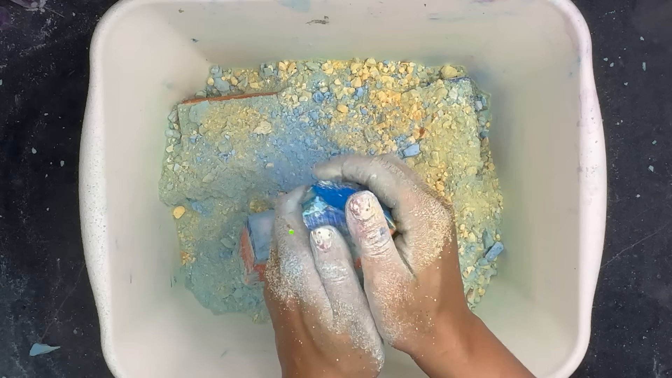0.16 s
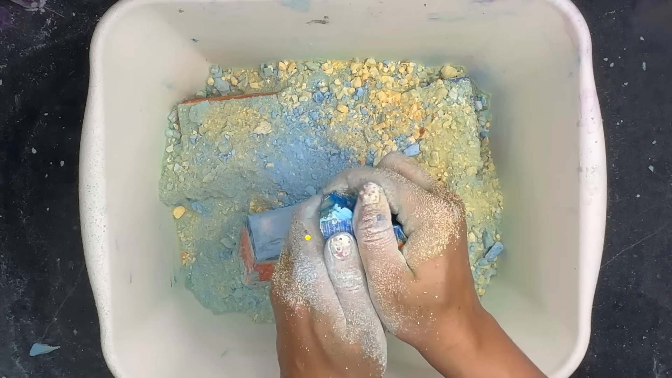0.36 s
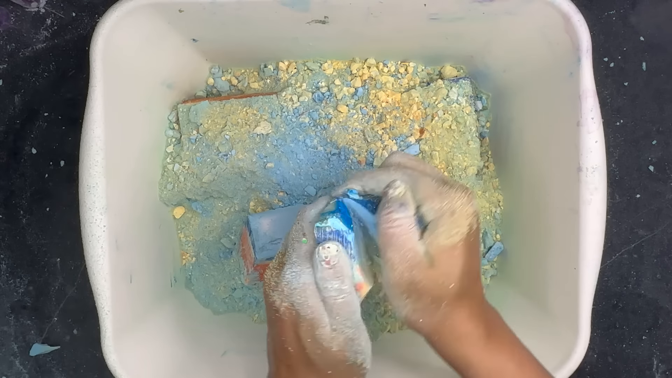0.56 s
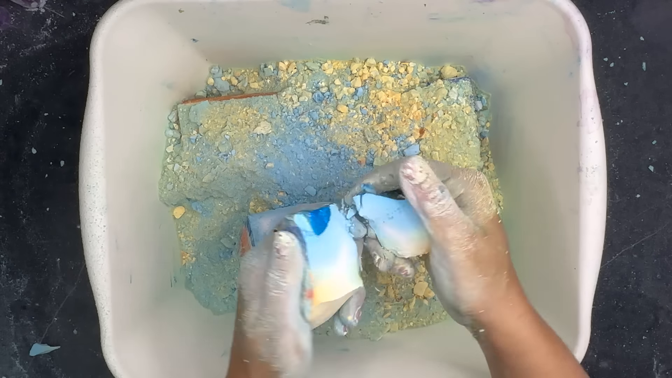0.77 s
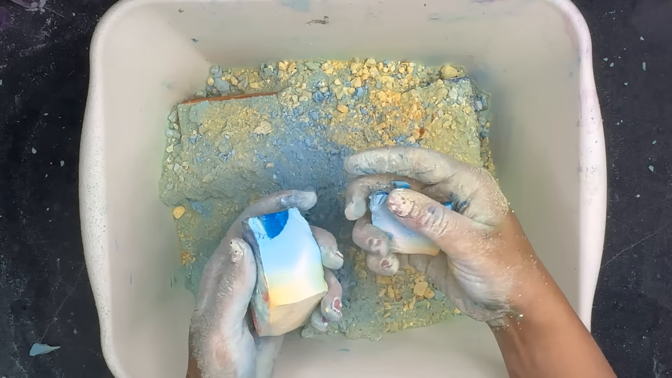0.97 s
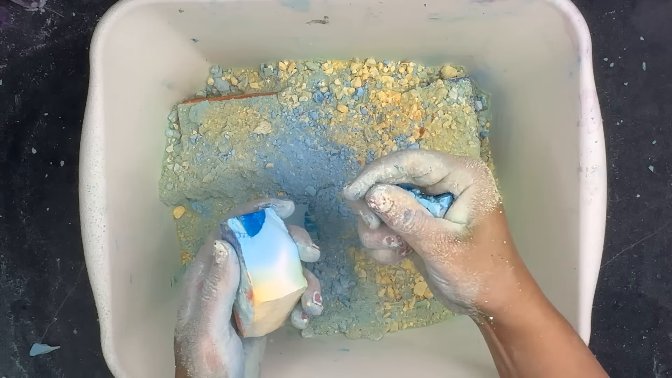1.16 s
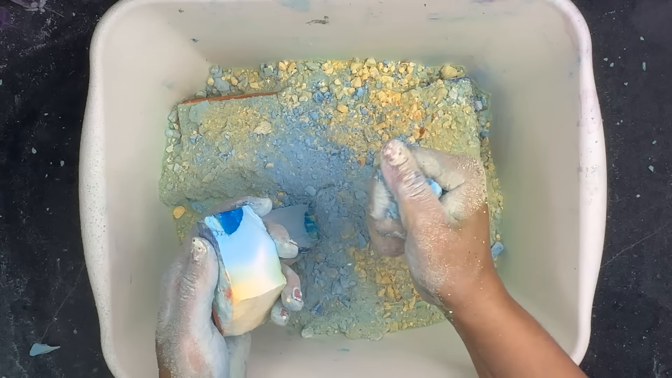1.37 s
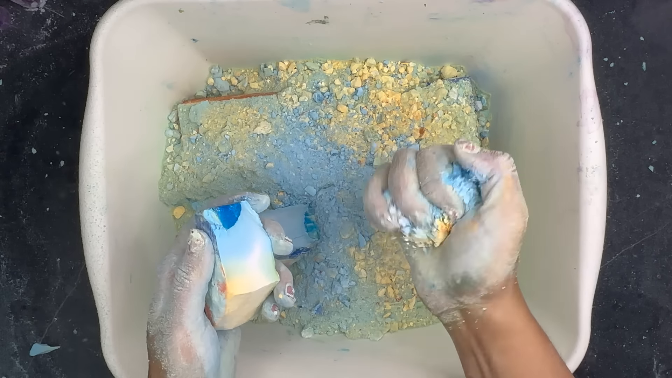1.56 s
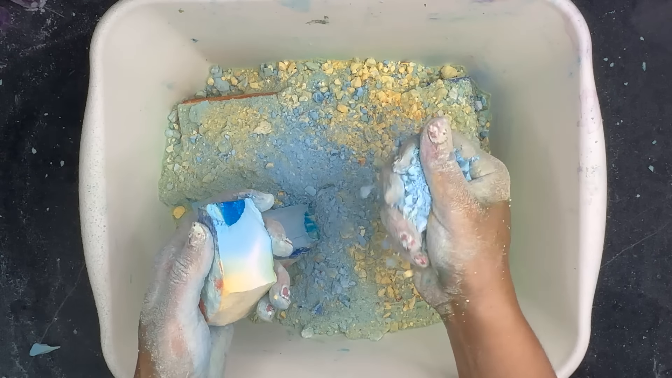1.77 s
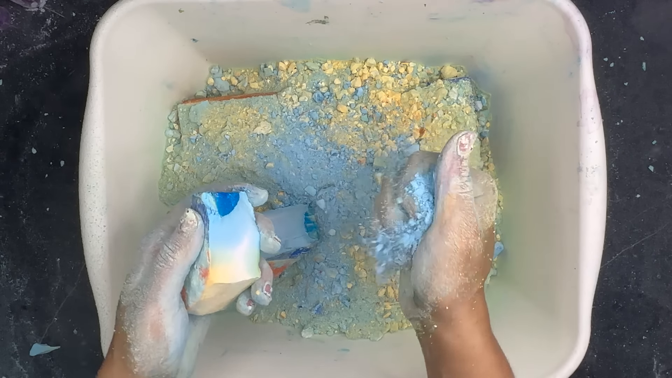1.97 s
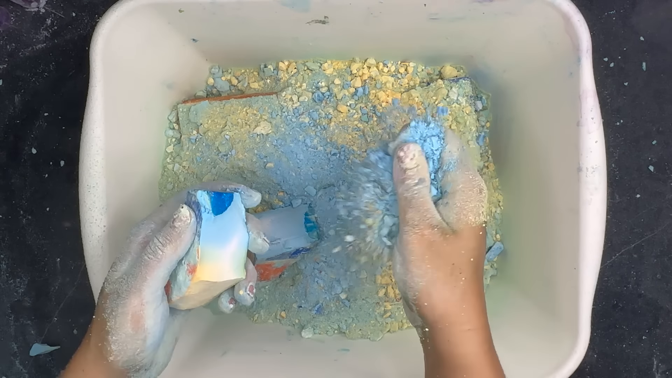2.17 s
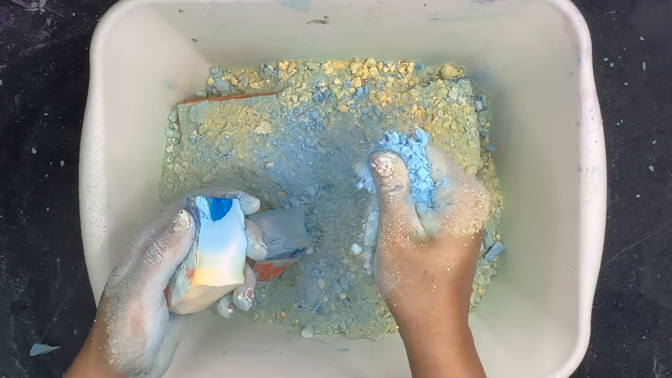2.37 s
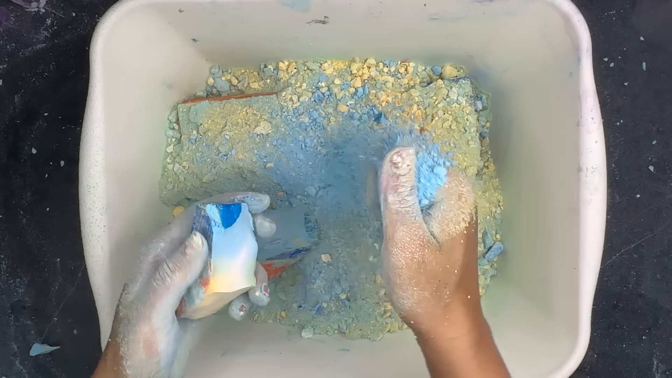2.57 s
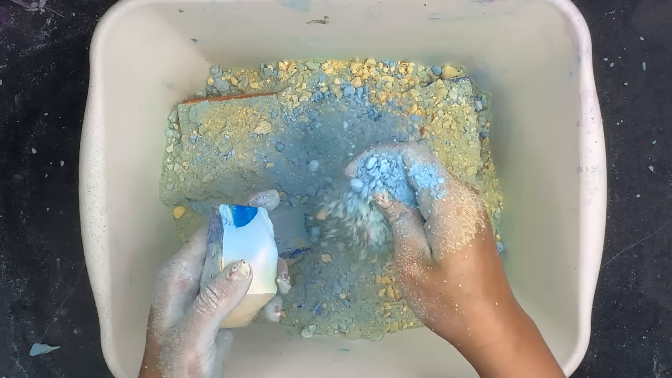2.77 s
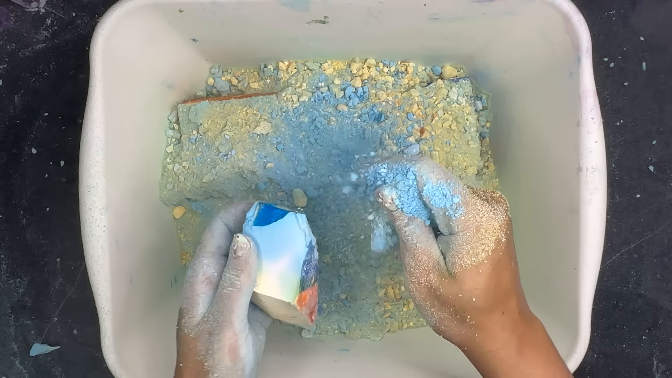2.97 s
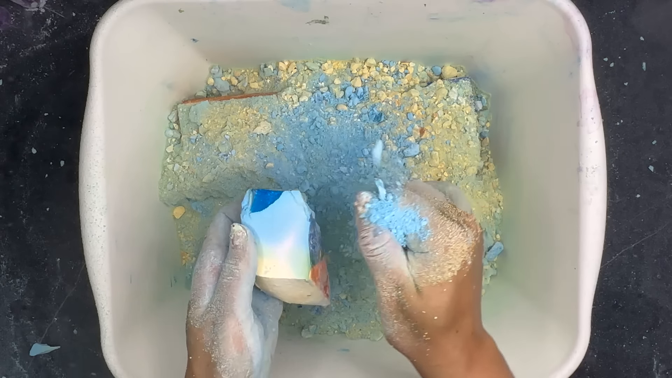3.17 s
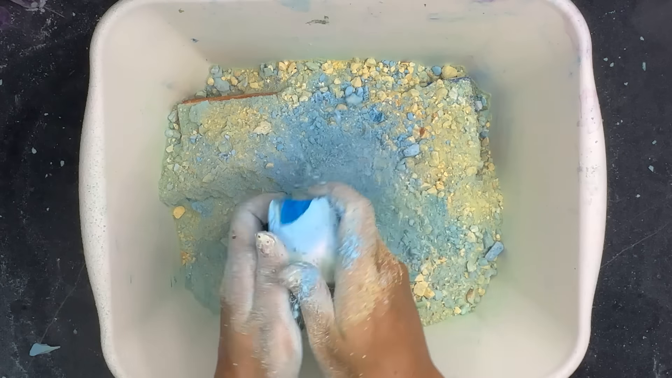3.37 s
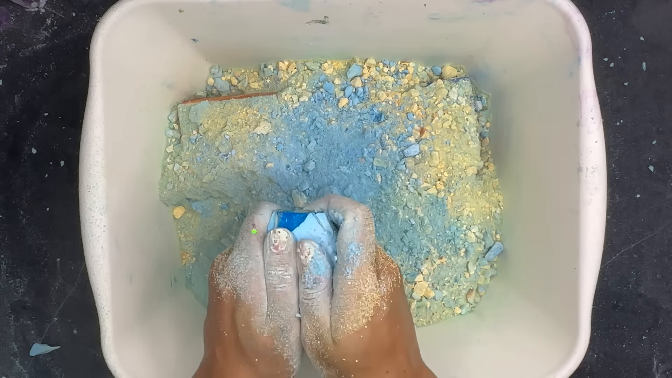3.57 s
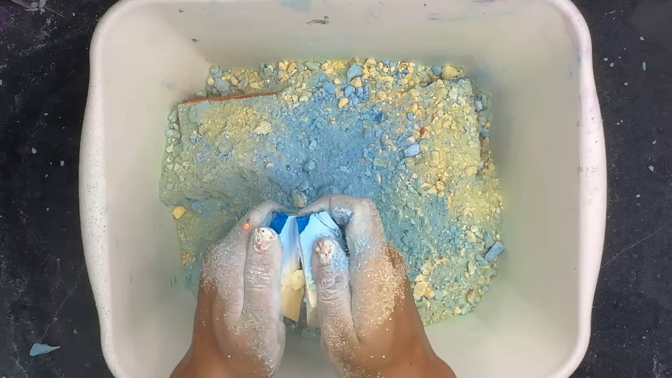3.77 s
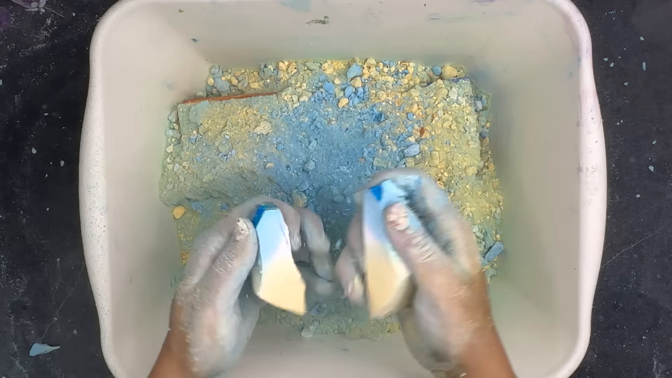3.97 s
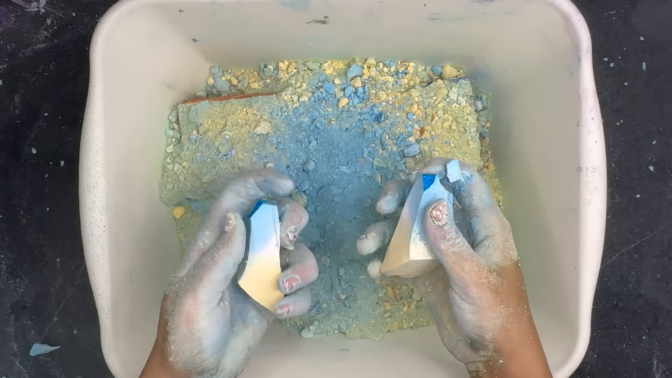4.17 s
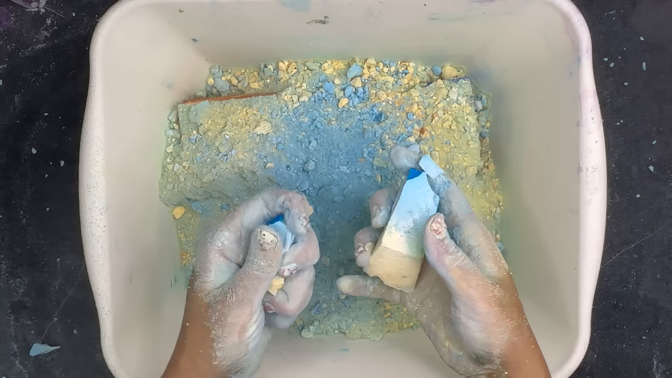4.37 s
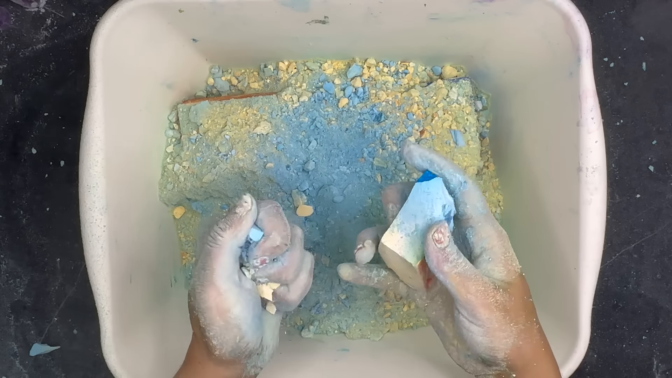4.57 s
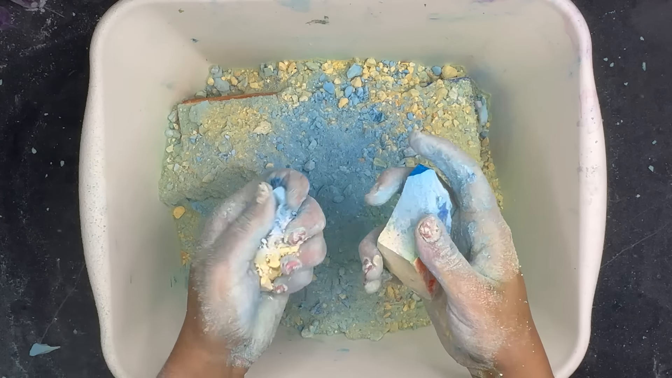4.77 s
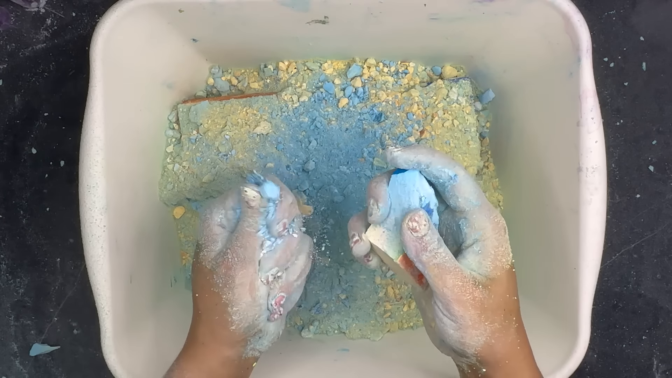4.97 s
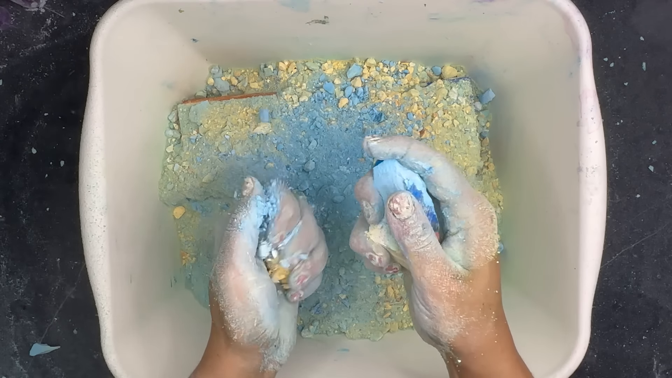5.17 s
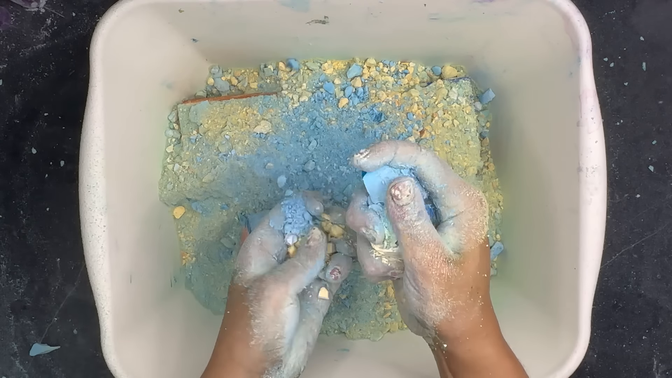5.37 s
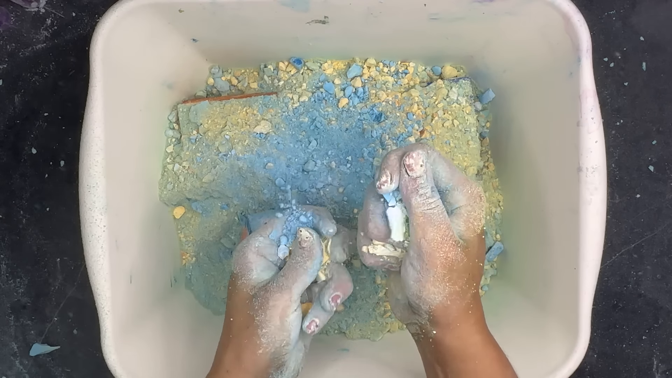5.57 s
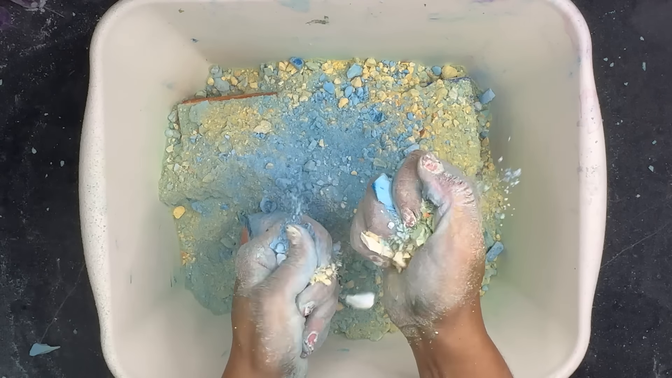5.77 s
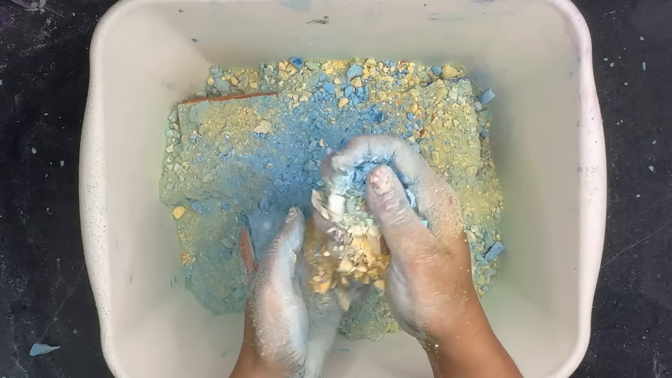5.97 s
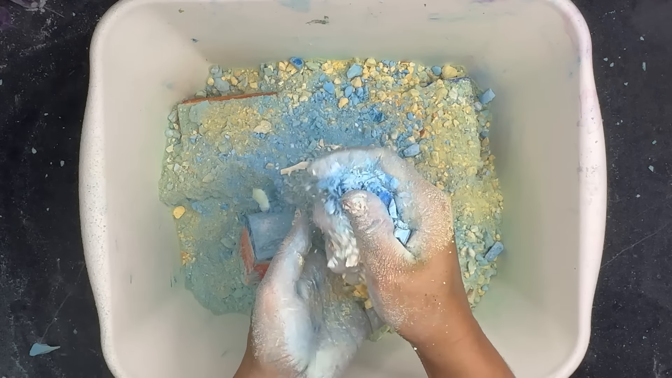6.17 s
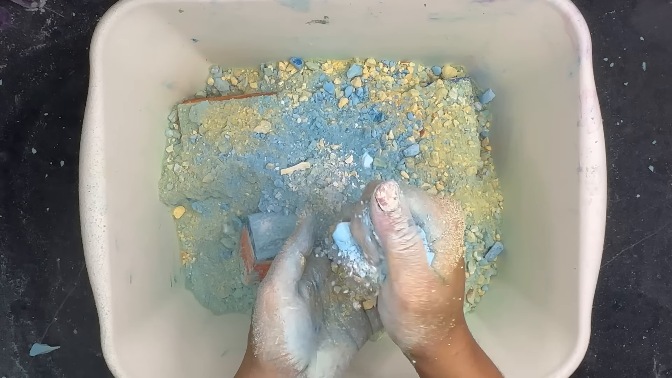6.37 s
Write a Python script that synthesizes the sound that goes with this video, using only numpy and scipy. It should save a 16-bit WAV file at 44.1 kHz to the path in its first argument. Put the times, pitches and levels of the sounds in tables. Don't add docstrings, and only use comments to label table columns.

```python
import sys
import numpy as np
from scipy import signal
from scipy.fft import rfft, irfft, next_fast_len
from scipy.io import wavfile

SR = 44100
rng = np.random.default_rng(int(sys.argv[2]) if len(sys.argv) > 2 else 0)


def volts(x):
    e = np.asarray(x, float) / 20
    return 10 ** e


def dump_mix(stems):
    frames = np.atleast_2d(stems).T
    limited = np.clip(frames, -1, 1)
    pcm = np.round(limited * 32767).astype(np.int16)
    wavfile.write(sys.argv[1], SR, pcm)


N = 282681

# hz, width_hz, level_db
BODY_MODES = [(428, 223, 4), (924, 158, 2.5), (1226, 170, 3.5)]
# hz, width_hz, level_db
HAND_MODES = [(1574, 490, -7), (2150, 520, -2.5), (2480, 367, -1.5), (2910, 360, -10.5)]
# hz, width_hz, level_db
FIZZ_MODES = [(3510, 1900, 5), (4570, 670, 9.5), (6110, 1170, 6.5), (7160, 6700, -11)]
# hz, width_hz, level_db
SHEEN_MODES = [(8780, 4500, 4.3), (16600, 19800, 3.8)]


def in_time(rows):
    s, *columns = np.transpose(rows)
    return [np.interp(np.arange(N) / SR, s, column) for column in columns]


def rms_one(x):
    return x / np.sqrt(np.mean(x ** 2) + 1e-20)


def peak_one(rows):
    return rows / np.max(np.abs(rows), axis=-1, keepdims=True)


def colour(x, points, turn=1):
    size = next_fast_len(N + 4096)
    hz = np.maximum(np.arange(size // 2 + 1) * SR / size, 1)
    point_hz, point_db = np.transpose(points)
    gain = volts(np.interp(np.log(hz), np.log(point_hz), point_db))
    return irfft(rfft(x, size) * gain * turn, size)[..., :N]


def steep(x, cut_hz):
    return signal.sosfilt(signal.butter(2, cut_hz, "high", fs=SR, output="sos"), x)


def resonate(x, peaks):
    out, power = 0, 0
    for k, (hz, width_hz, level_db) in enumerate(peaks):
        r = np.exp(-np.pi * width_hz / SR)
        poles = [1, -2 * r * np.cos(2 * np.pi * min(hz, 20000) / SR), r * r]
        zeros = [(1 - r * r) / 2, 0, (r * r - 1) / 2]
        out = out + (-1) ** k * volts(level_db) * signal.lfilter(zeros, poles, x + 1e-18)
        power += volts(level_db) ** 2 * (1 - r * r) / 2
    return out / np.sqrt(power)


def resonate_each(rows, pitches_hz, width_hz):
    return np.array([resonate(row, [(hz, width_hz, 0)]) for hz, row in zip(pitches_hz, rows)])


def drift(rate_hz):
    r = np.exp(-2 * np.pi * rate_hz / SR)
    settle = 9000
    noise = rng.standard_normal(N + settle)
    return rms_one(signal.lfilter([1], [1, -2 * r, r * r], noise)[settle:])


def lay(table, sounds):
    out = np.zeros(N + sounds.shape[1])
    for (s, level_db, *rest), sound in zip(table, sounds):
        start = round(s * SR)
        out[start:start + len(sound)] += volts(level_db) * sound
    return out[:N]


def rumble():
    # hz, level_db per hz
    spectrum = [(22, -14.5), (36, -12), (62, 1), (105, -5.5), (233, -20.5), (500, -32), (1500, -59.5),
                (3300, -120)]
    # hz, level_db
    side_spectrum = [(20, -27), (70, -28.5), (130, -19.5), (250, -8.5), (500, 0.5), (1500, 13)]
    # start_s, level_db
    swell = [
        (0.0, -2),
        (1.0, -2.5),
        (2.2, 1.7),
        (3.3, -1.5),
        (4.5, 0),
        (6.41, 0.5),
    ]
    middle, side = steep(colour(rng.standard_normal((2, N)), spectrum), cut_hz=14.0)
    level_db = -40 + in_time(swell)[0] + 0.77 * drift(0.78)
    return np.array([middle, colour(side, side_spectrum)]) * volts(level_db) / np.std(middle)


def room(x):
    t60_s, level_db = 0.33, -22
    t = np.arange(SR // 3) / SR
    dull = signal.lfilter([1], [1, -0.8], rng.standard_normal((2, len(t))))
    tails = dull * volts(-60 * t / t60_s) * (t > 0.004)
    tails = tails / np.sqrt(np.sum(tails ** 2, axis=1, keepdims=True))
    return volts(level_db) * signal.fftconvolve(x[None], tails, axes=1)[:, :N]


def thuds():
    # start_s, peak_db, wall_hz, t60_s, rattle_db re peak
    blows = [(0.366, -43.5, 72, 0.38, 0.5), (0.5408, -28.5, 231.3, 0.19, -3),
             (0.559, -23.5, 187, 0.086, -12), (1.233, -31, 236, 0.064, -3.5),
             (1.268, -27, 198, 0.091, -7.5), (1.577, -40.5, 71.6, 0.58, 0), (2.556, -33, 139.5, 0.27, -14),
             (2.598, -47.5, 76, 1, 0), (3.577, -36, 72.7, 0.029, -2), (3.691, -38, 78.8, 0.39, 2),
             (4.372, -35.5, 168, 0.13, -16), (5.18, -38.5, 76, 0.22, -0.5), (5.32, -34.5, 75.4, 0.39, -11),
             (5.628, -32.5, 118.3, 0.2, -3)]
    t = np.arange(12000) / SR
    s, peak_db, wall_hz, t60_s, rattle_db = np.transpose(blows)[:, :, None]
    band = signal.butter(1, [140, 560], "band", fs=SR, output="sos")
    rattles = signal.sosfilt(band, rng.standard_normal((len(blows), len(t))))
    rattles = signal.sosfilt(signal.butter(2, 1900, fs=SR, output="sos"), rattles)
    fall = (1 - np.exp(-t / (0.0054 * t60_s))) * volts(-60 * t / t60_s)
    turn = 2 * np.pi * wall_hz * t
    tone = np.sin(turn) + 0.51 * np.sin(2 * turn)
    return lay(blows, fall * (tone + volts(rattle_db) * rms_one(rattles)))


def flex():
    start_s, length_s, pitch_hz, level_db = 1.592, 0.084, 85.8, -24
    # multiple, level_db
    partials = [(1, 0), (2, -4), (4, -11.5), (6, -12.5), (8, -28)]
    t = np.arange(8000) / SR
    turn = 2 * np.pi * pitch_hz * t * (1 - 1.37 * t)
    tone = sum(volts(partial_db - 69.0 * k * t) * np.sin(k * turn) for k, partial_db in partials)
    swell = np.sin(np.pi * np.minimum(t / length_s, 1)) ** 0.5
    return lay([(start_s, level_db)], (tone * swell)[None])


def pings():
    # start_s, peak_db, upper_mode_db
    strikes = [
        (2.7965, -25.5, -12),
        (2.9404, -15, -3.5),
    ]
    # hz, t60_s
    modes = [(2340, 0.036), (4080, 0.028)]
    t = np.arange(4000) / SR
    onset = 1 - np.exp(-t / 0.00048)
    low, high = (volts(-60 * t / t60_s) * np.sin(2 * np.pi * hz * t) * onset for hz, t60_s in modes)
    return lay(strikes, np.array([volts(1.0) * low + volts(upper_db) * high for _, _, upper_db in strikes]))


def rubs():
    # start_s, level_db, skin_hz, length_s
    strokes = [(0.053, -50.5, 5850, 0.062), (0.751, -55, 6560, 0.19), (0.961, -56.5, 6850, 0.041),
               (1.14, -34, 6700, 0.013), (1.149, -54, 6500, 0.019), (1.32, -38, 6400, 0.057),
               (3.063, -52, 6860, 0.058), (3.344, -54.5, 6460, 0.16), (3.831, -57.5, 5030, 0.1),
               (3.92, -47, 7450, 0.062), (3.994, -45.5, 5730, 0.1), (4.168, -60.5, 6700, 0.12)]
    t = np.arange(8000) / SR
    s, rub_db, skin_hz, length_s = np.transpose(strokes)
    swell = np.sin(np.pi * np.minimum(t / length_s[:, None], 1)) ** 0.92
    hiss = rng.standard_normal((len(strokes), len(t)))
    skin = resonate_each(hiss, skin_hz, width_hz=750)
    apart = (s > 3.8) & (s < 4.3)
    sheen = volts(8.5 + 3.5 * apart)[:, None] * resonate(hiss, SHEEN_MODES)
    wide = resonate(hiss, FIZZ_MODES) + sheen + volts(-29.0) * resonate(hiss, HAND_MODES)
    return lay(strokes, swell * steep(skin + wide, cut_hz=650))


def grip():
    # start_s, length_s, change_db
    changes = [(0.119, 0.055, -5.5), (0.412, 0.12, -9.5), (0.616, 0.044, -4.5), (0.884, 0.071, -5),
               (1.022, 0.037, -6.5), (1.489, 0.1, -6), (1.675, 0.12, 1.5), (2.005, 0.092, -5.5),
               (2.243, 0.14, 3.5), (2.596, 0.1, -4), (2.674, 0.021, 5.5), (3.194, 0.17, -7),
               (3.485, 0.056, -4), (3.598, 0.083, -12.5), (3.75, .08, -8), (4.646, 0.077, -9.5),
               (4.724, 0.098, 5), (4.927, 0.059, 6), (5.148, 0.032, -6.5), (5.763, 0.05, -6.5),
               (5.821, 0.052, -6), (6.134, 0.05, 5)]
    ease_s = 0.016
    t = np.arange(N) / SR
    total_db = 0
    for s, length_s, change_db in changes:
        inside_s = np.minimum(t - s, s + length_s - t)
        total_db = total_db + change_db * np.clip(inside_s / ease_s + 0.5, 0, 1)
    return volts(total_db)


def grinding(per_s, spread_db, clump_db, dust):
    # start_s, pressure_db, coarseness_db
    pressure = [(0.0, -63.5, -18.5), (0.59, -58, 13), (0.69, -57.5, 6), (1.09, -57.5, -3), (1.3, -42, 1.5),
                (1.41, -47, 2), (2.03, -49.5, 9.5), (2.96, -49.5, 5.5), (3.21, -53.5, 3.5),
                (4.32, -62.5, -6.5), (4.44, -36, -1.5), (4.62, -50, 5.5), (5.16, -50.5, 3),
                (5.55, -45, 1.5), (5.73, -43.5, 6), (5.93, -47.5, 4), (6.07, -50.5, 2.5), (6.41, -46, 7.5)]
    # level_db, share of pressure, share of coarseness
    layers = [
        (-47, 0.79, 0.14),
        (-58, 0.99, 1),
        (-48, 1.02, -0.3),
        (-43, 1.43, -0.63),
    ]
    dust_shares = [
        0.77,
        0.49,
        1,
        1.4,
    ]
    mean_pressure_db = -52
    modes = (HAND_MODES, BODY_MODES, FIZZ_MODES, SHEEN_MODES)
    cuts_hz = (380, 380, 2300, 7470)
    clumps = volts(clump_db * drift(30.0))
    born = rng.random(N) < per_s * clumps / SR
    sizes = born * volts(spread_db * np.minimum(rng.exponential(1, N), 2.6))
    grain = signal.lfilter([1], [1, -0.94], sizes)
    pressure_db, coarse_db = in_time(pressure)
    out = 0
    for (level_db, follows, leans), peaks, cut_hz, share in zip(layers, modes, cuts_hz, dust_shares):
        grains = rms_one(grain * rng.standard_normal(N))
        hiss = share * dust * rng.standard_normal(N) * volts(2.5 * drift(9.7))
        gain = volts(level_db + follows * (pressure_db - mean_pressure_db) + leans * coarse_db)
        out = out + steep(resonate(rms_one(grains + hiss) * gain, peaks), cut_hz)
    return out


LENGTH_SCATTER = 0.43


def swarms(count, lengths_ms, after):
    t = np.arange(2600) / SR
    rows = len(lengths_ms)
    noise = rng.standard_normal((rows, count, len(t)))
    noise = noise * volts(3.17 * rng.standard_normal((rows, 1, len(t))))
    fall_s = np.maximum(lengths_ms, 0.3)[:, None, None] / 1000
    decay = np.exp(-t / (0.2 * fall_s)) + after * np.exp(-t / (4.1 * fall_s))
    bursts = noise * (1 - np.exp(-t / (0.3 * fall_s))) * decay
    bursts[..., 12] += 6.3 * np.sqrt(np.mean(bursts[..., :180] ** 2, axis=2))
    return bursts / np.sqrt(np.mean(bursts[..., :180] ** 2, axis=2, keepdims=True))


def cracks(table, luck):
    s, ring_db, body_db, rasp_db, lump_hz, knock_hz, edge_hz = table.T
    length_ms = 3.52 * np.exp(LENGTH_SCATTER * luck[0])
    body_hz = np.where(s < 0.7, 410, 960) * np.exp(0.072 * luck[1])
    body_hz = np.where(knock_hz > 0, knock_hz, body_hz)
    low, high = swarms(count=2, lengths_ms=length_ms, after=0.031).transpose(1, 0, 2)
    snap = swarms(count=1, lengths_ms=0.22 * length_ms, after=0.0023)[:, 0]
    lump = resonate_each(snap, lump_hz, width_hz=300)
    knock = resonate_each(resonate_each(snap, body_hz, width_hz=430), body_hz, width_hz=430)
    knock = np.roll(knock, 36, axis=1)
    bare = resonate(steep(snap, cut_hz=940), [(1700, 2500, 0)])
    ring = peak_one(peak_one(resonate(high, HAND_MODES)) + volts(3.0) * peak_one(lump))
    ring = peak_one(ring + volts(-8.5) * peak_one(bare))
    body = peak_one(steep(resonate(low, BODY_MODES), cut_hz=127))
    body = peak_one(body + volts(6.0) * peak_one(knock)) * volts(body_db + 4.5)[:, None]
    return volts(-1.0) * lay(table, ring + body)


def rasps(table, luck):
    s, rasp_db, given_hz = table[:, 0], table[:, 3:4], table[:, 6]
    blunt = luck[2] < np.quantile(luck[2], 0.1)
    blunt |= (s > 1.1) & (s < 1.31)
    edge_hz = np.where(blunt, 3770, 6320) * np.exp(0.043 * luck[1])
    edge_hz = np.where(given_hz > 0, given_hz, edge_hz)
    length_ms = 4.25 * np.exp(LENGTH_SCATTER * luck[3])
    bursts = swarms(count=1, lengths_ms=length_ms, after=0.039)[:, 0]
    edge = resonate_each(bursts, edge_hz, width_hz=600)
    fizz = steep(resonate(bursts, FIZZ_MODES) + volts(-4.5) * edge, cut_hz=2630)
    sheen = volts(7.5) * steep(resonate(bursts, SHEEN_MODES), cut_hz=7000)
    loudest = np.max(np.abs(fizz), axis=1, keepdims=True)
    return lay(table, volts(rasp_db + 5.0) * (fizz + sheen) / loudest)


def further_breaks():
    # start_s, peak_db, body_db re ring, rasp_db re ring
    crumbs = [(0.0234, -52, -10, 16), (0.0764, -42, -2, 1), (0.0836, -44.5, -2, 3), (0.2843, -52, -19, 15),
              (0.3053, -37, -22, 2), (0.5403, -20, -21, 4.5), (0.785, -38, -26, -7), (0.844, -35, -25, 4),
              (0.9802, -47.5, -7, 5), (1.2005, -15, -19, -17), (1.3401, -14, -6, 1), (1.431, -20.5, -14, 0),
              (1.492, -37, -9, -2), (1.5993, -43, -8, -3), (1.7254, -23, -18, -10),
              (1.8043, -31.5, 0, -0.5), (1.8472, -45, -14, 0), (1.8615, -35, 1.5, -1),
              (1.9048, -34.5, -1, 6), (2.0075, -34, -14, 2), (2.1076, -31, -14, -7), (2.1581, -25, -6, -10),
              (2.277, -28, -23, -7), (2.5137, -54, -16, -6), (2.6349, -41, -11, -1), (2.674, -36, -16, -3),
              (2.686, -29, -17, 5), (2.7373, -34, -4, -2), (2.8804, -21.5, -20.5, -5),
              (2.8993, -36.5, -2.5, -7), (3.019, -23, -4, -11), (3.1242, -24, -17, -10),
              (3.1602, -58, -16.5, -13), (3.3672, -41, -17, -6), (3.38, -26.5, -16, 0.5),
              (3.4226, -33, -7, -0.5), (3.456, -31, -9, 2.5), (3.5397, -38.5, -21.5, -1.5),
              (3.6414, -47, -11.5, -12), (4.3696, 3, -13.5, -10.5), (4.4264, -10, -26, -3),
              (4.4774, -9.5, -12.5, -4.5), (5.1392, -39, -17, 13), (5.1934, -11.5, -18, -5.5),
              (5.3125, -15.5, -12, -8), (5.5405, -20, -20, -8), (5.6299, -12, -16, 0.5),
              (5.714, -26.5, -12, 5), (6.2044, -36, -14, 4.5), (6.3768, -30.5, 1, 2)]
    luck = rng.standard_normal((len(crumbs), 5))
    luck[:, (0, 3)] = 0.5 * luck[:, (0, 3)] - 2.1
    crumb_hz = 2440 * np.exp(0.24 * luck[:, 4:])
    table = np.hstack([crumbs, crumb_hz, np.zeros((len(crumbs), 2))])
    return volts(-9.5) * (cracks(table, luck.T) + rasps(table, luck.T))


def fractures():
    # start_s, ring_db, body_db re ring, rasp_db re ring, lump_hz
    snaps = [(0.542, -18, 0.5, -10, 2480), (0.5701, -20, -40, -5, 2380), (1.1305, -7.5, -20, -12, 2460),
             (1.2112, -19, -15, -5.5, 2480), (1.2335, -1.5, -12, -15.5, 2400),
             (1.303, -19.5, -19, -5, 2220), (1.326, -16.5, -11.5, -14, 2400), (2.797, -21, -14, -9, 2440),
             (2.9399, -21, -14.5, -4.5, 2300), (2.9801, -17.5, -14, -8, 2150),
             (3.691, -10.5, -3, -12.5, 1660), (4.3115, -22, -8.5, -8, 2760), (4.325, -15, -16, 2, 3070),
             (4.3743, -1, -14.5, -5.5, 2480), (4.4197, -13, -22, -0.5, 2620),
             (4.8538, -21.5, -12.5, -20, 2700), (5.1817, -13.5, -9.5, -3, 2200),
             (5.3214, -3.5, -8, -5, 2220), (5.4835, -7, -26, 0, 2660), (5.5976, -9, -17, -11.5, 2480),
             (5.6366, -18, -31, -5, 2730), (6.11, -15.5, -8, -5, 2020), (6.244, -22.5, -12, -1, 1600),
             (6.33, -16, -34, -10.5, 2150)]
    # knock_hz, edge_hz
    snap_colour = [(440, 7300), (440, 5700), (1160, 4300), (470, 4860), (964, 3740), (1170, 4360),
                   (935, 6410), (1420, 4210), (1290, 3700), (815, 6800), (860, 6300), (1390, 7000),
                   (1040, 4200), (940, 7530), (920, 6370), (930, 4400), (1020, 6500), (890, 5900),
                   (885, 6170), (1170, 6200), (1220, 6830), (940, 6360), (1110, 6060), (1020, 3940)]
    snap_tear = [1.5, 0.9, -0.4, 3, 1.2, 2.5, 3.5, -0.5, -0.4, -0.5, -5, 0, -1, 0.7, -1.5, 0.2, -0.2, -1.5,
                 -2.5, 1.4, 1.5, 2.5, 2.5, -1]
    # start_s, ring_db, body_db re ring,
    # rasp_db re ring
    small_pieces = [(0.553, -22.5, -28, -5), (0.597, -32.5, -25, -4), (1.0673, -35, -21, -4),
                    (1.146, -22.5, -17, 1.5), (1.1606, -21.5, -8, -3.5), (1.2762, -28.5, 2, 7),
                    (1.3175, -17, -32, -4), (1.384, -41.5, -14, 17), (1.4005, -30.5, -8, 6),
                    (1.426, -29.5, -18, 3), (1.556, -39, -26, 4.5), (1.717, -29.5, -12, -18),
                    (1.7363, -29, -19, -28), (2.2694, -30, -20, -5), (2.3001, -32.5, -4.5, 1.5),
                    (2.385, -45.5, 6.5, 11), (2.4546, -41, -4, -2), (2.756, -26, -14.5, -7.5),
                    (3.038, -24.5, -17, -5.5), (3.2824, -41, -14, -7), (3.5739, -38, -17.5, -3),
                    (3.8651, -28.5, -35, -25), (3.964, -38.5, -29, 9.5), (4.287, -33, -31, 3),
                    (4.406, -28, -28, 7), (4.4726, -14.5, -17, -17), (4.5, -21.5, -13, -1),
                    (4.586, -35, -31, -9), (4.746, -30, -13, -8), (4.779, -28, -20, -15),
                    (4.8989, -33, -9, -6), (4.9527, -42, 3, 10), (5.0231, -42.5, -9, 13),
                  (5.0469, -39.5, -5, 8.5), (5.0616, -37, -6, 5), (5.0778, -38.5, -1, 9.5),
                  (5.0933, -36.5, -32, 10), (5.237, -29, -15, -4), (5.2645, -19.5, -15, -7.5),
                  (5.3557, -30.5, -15, 4), (5.3883, -28.5, 1, -22), (5.4086, -14.5, -13.5, -8),
                  (5.4498, -13, -14.5, -2.5), (5.5042, -29.5, -10, 1), (5.5263, -27.5, -26, 7),
                  (5.5505, -25.5, -29, -4), (5.5812, -19, -21, -9.5), (5.593, -17, -22, -10),
                  (5.599, -28.5, -10, -1.5), (5.6339, -23.5, -3.5, 1), (5.657, -20.5, -8, -7),
                  (5.671, -21, -21, -3.5), (5.681, -26.5, -9, 1.5), (5.7078, -27.5, -24, 3.5),
                  (5.7373, -21.5, -20, -24), (5.8117, -29.5, -13.5, -4),
                    (5.8794, -31, -13, -14), (5.898, -29, -16, -3), (5.917, -23, -7.5, -1.5),
                (5.9418, -25.5, -34, -14), (5.9607, -20.5, -19, -22), (5.9714, -26, -17, -12),
                (5.991, -18, -21, -1.5), (6.0342, -47, -28, -1), (6.0528, -21, -31, 3),
                (6.062, -23, -23, -12), (6.093, -19, -29, -3.5), (6.13, -16.5, -19, -13),
                (6.1508, -26, -9, -13), (6.1996, -43, -3, 8), (6.223, -36, -19, 3.5),
                (6.2604, -33.5, -11, 1), (6.3061, -36, -11, -3), (6.34, -18.5, -10, -11.5),
                (6.3505, -27, -19, 2.5)]
    crackle_hz = [2540, 1890, 2570, 2920, 1740, 2580, 2370, 2870, 2010, 2220, 2360, 1800, 2230, 2330, 1720,
                  2810, 2530, 1500, 2100, 2540, 2400, 1970, 2540, 2330, 2530, 2500, 2820, 2610, 2760, 2800,
                  2550, 1570, 2490, 2330, 1930, 1720, 2400, 2370, 2440, 2650, 1360, 2480, 2360, 1970, 2150,
                  2420, 1970, 2690, 2720, 2820, 2580, 2730, 2670, 2830, 1990, 2050, 2570, 2070, 1570, 2110,
                  2130, 2170, 2300, 2830, 2240, 2250, 2780, 2230, 2130, 2590, 2520, 2500, 2010, 2170, 1360]
    small = np.array(small_pieces)
    big = len(snaps)
    luck = rng.standard_normal((big + len(small), 5))
    luck[:big] *= 0.48
    luck[:big, (0, 3)] = np.array(snap_tear)[:, None]
    luck[big:, (0, 3)] = 0.79 * luck[big:, (0, 3)] - 0.5
    starts_s = np.r_[np.array(snaps)[:, 0], small[:, 0]]
    luck[:, (0, 3)] -= 2.6 * (starts_s > 5.95)[:, None]
    snap_rows = np.c_[snaps, snap_colour]
    small_rows = np.c_[small, crackle_hz, np.zeros((len(small), 2))]
    return np.vstack([snap_rows, small_rows]), luck.T


def scene():
    # hz, level_db
    port_sum = [(100, 2.5), (5000, -0.81), (8000, -1), (10000, -9.5), (11700, -20.5), (13500, -15),
                (15200, -7), (16300, -21)]
    # hz, level_db
    port_diff = [(100, -19), (700, -10), (1800, -17.5), (3000, -9), (5000, -12), (7500, -2.5), (13500, -8),
                 (16300, 0)]
    # hz, level_db
    grind_sum = [(100, -9.5), (9000, -0.3), (10500, 0), (12000, -13), (14000, -3), (15500, 3),
                 (16300, -0.5)]
    # start_s, sum_treble_db, difference_treble_db
    off_line = [(0.0, 3, 0), (.55, 2, 2), (1.0, 2, 2.5), (1.3, -7, -4), (1.45, -9, -4.5), (2.2, -6.5, -8.5),
                (2.35, -3, -6), (2.9, -5.5, -3.5), (3.1, -2.5, -3.5), (3.4, -3, -2), (3.8, 4.5, 3.5),
                (4.22, 2.5, 5), (4.33, -6, -2), (4.65, 0.5, -2), (5.0, 1, 0), (5.4, -3.5, -0.5),
                (5.9, -5, -5.5), (6.41, -2, -1)]
    # hz, level_db
    treble = [(7500, -40), (9500, 0)]
    crumbs = grinding(per_s=700, spread_db=2.0, clump_db=7.0, dust=1.0) * grip()
    broken = fractures()
    breaks = cracks(*broken) + rasps(*broken) + rubs() + pings()
    knocks = thuds() + flex()
    breaks = breaks + further_breaks()
    sum_db, difference_db = in_time(off_line)
    middle = colour(breaks + colour(crumbs, grind_sum), port_sum)
    middle = middle + (volts(sum_db) - 1) * colour(middle, treble) + knocks
    across = breaks + volts(1.5) * crumbs
    across = across + volts(-14.0) * np.roll(across, 310)
    across = across + (volts(difference_db) - 1) * colour(across, treble)
    side = colour(across, port_diff, turn=-1j) + volts(-41.0) * knocks
    tail = room(middle) * volts([[0.1], [-5.0]])
    middle, side = np.array([middle, side]) + tail + rumble()
    return np.array([middle + side, middle - side])


def roll_off(x):
    return signal.sosfilt(signal.butter(12, 16050, fs=SR, output="sos"), x)


def record(dry):
    mix = np.clip(dry, -1, 1)
    return roll_off(mix)


dry = scene()
out = record(dry)
dump_mix(out)
```